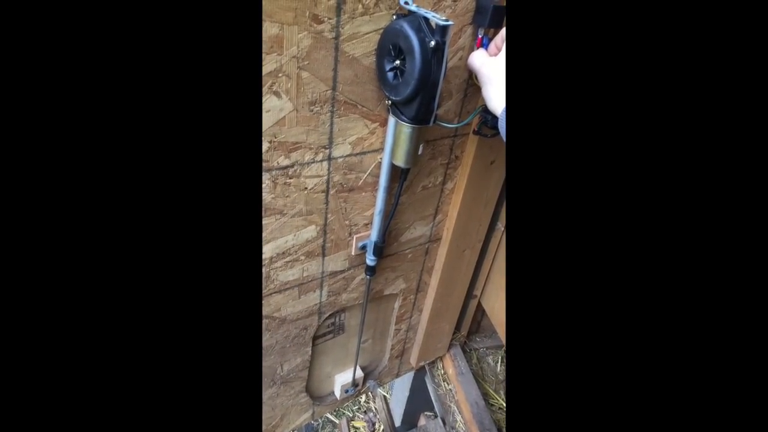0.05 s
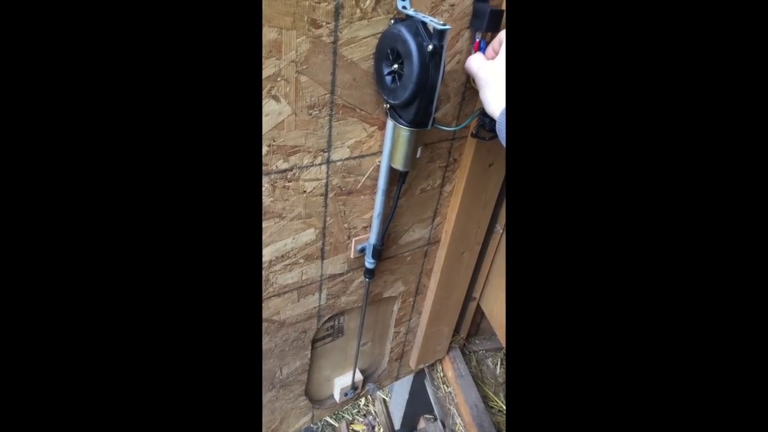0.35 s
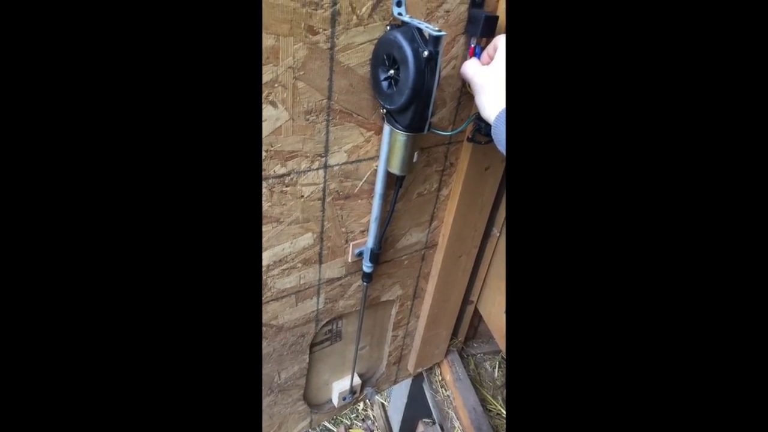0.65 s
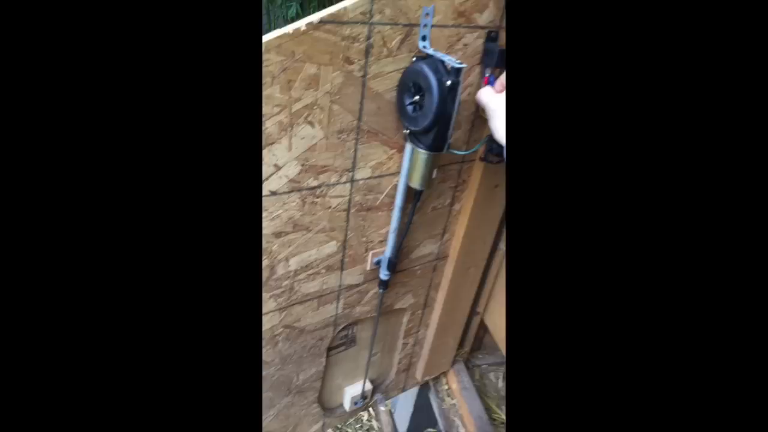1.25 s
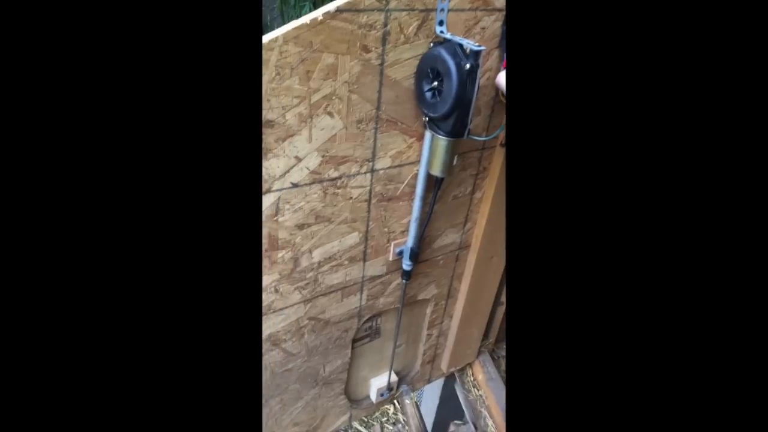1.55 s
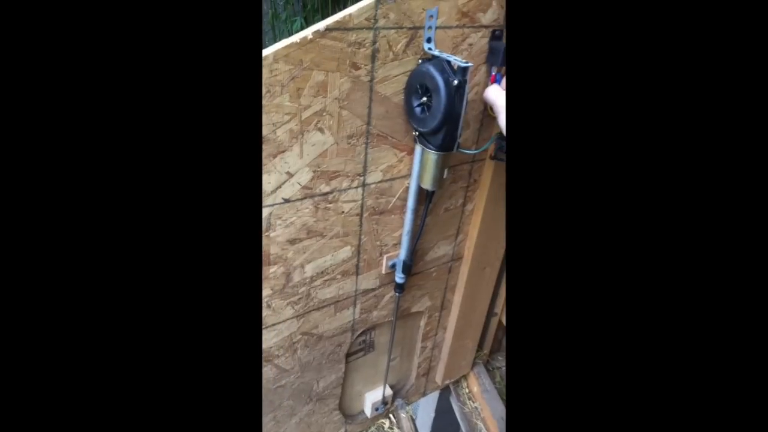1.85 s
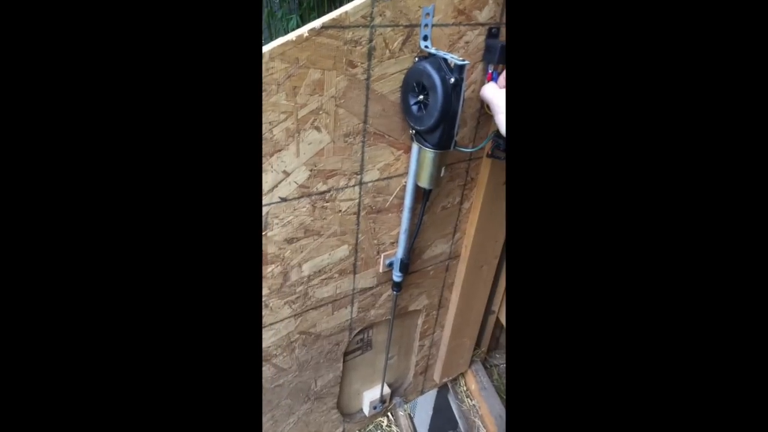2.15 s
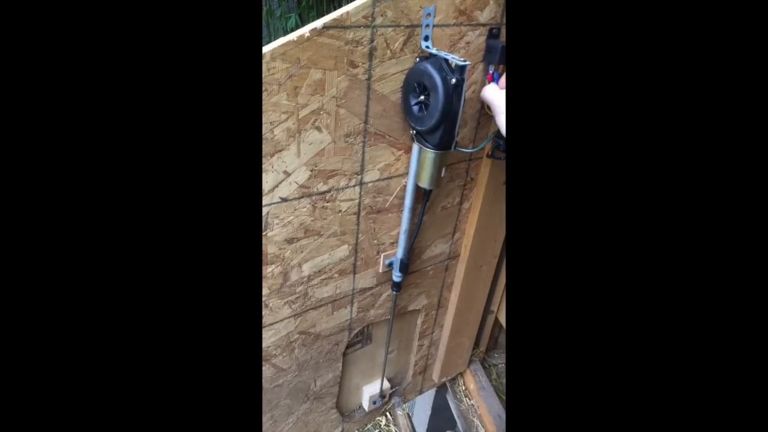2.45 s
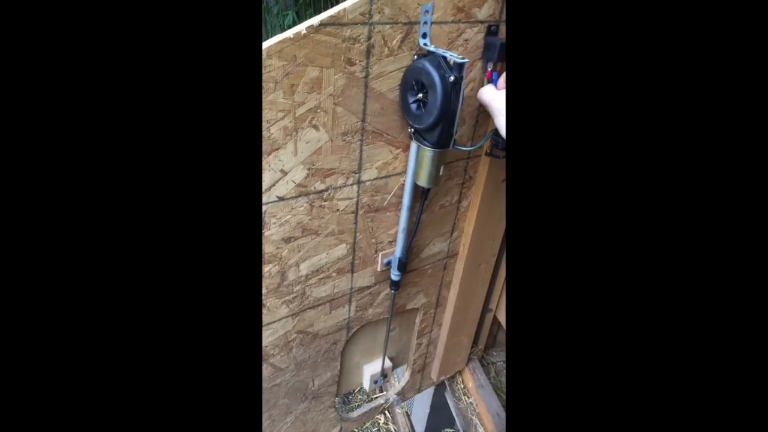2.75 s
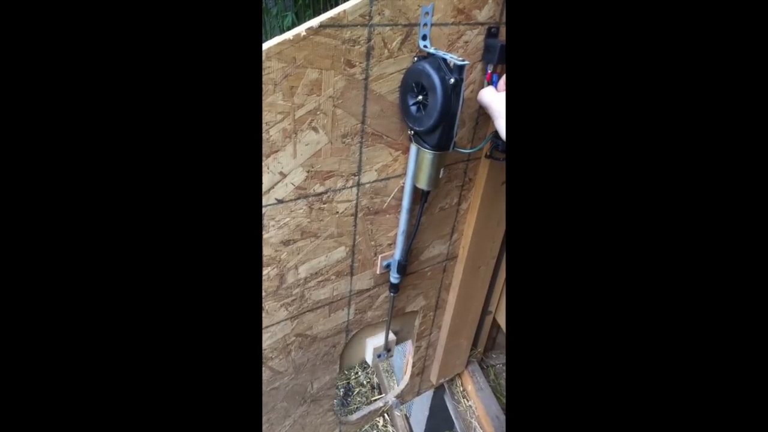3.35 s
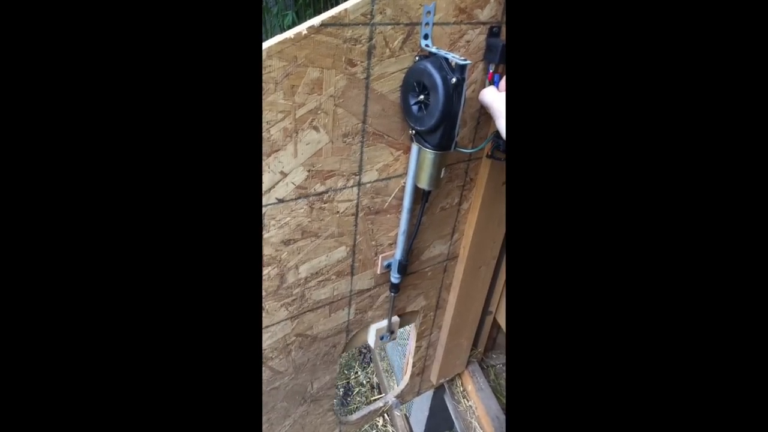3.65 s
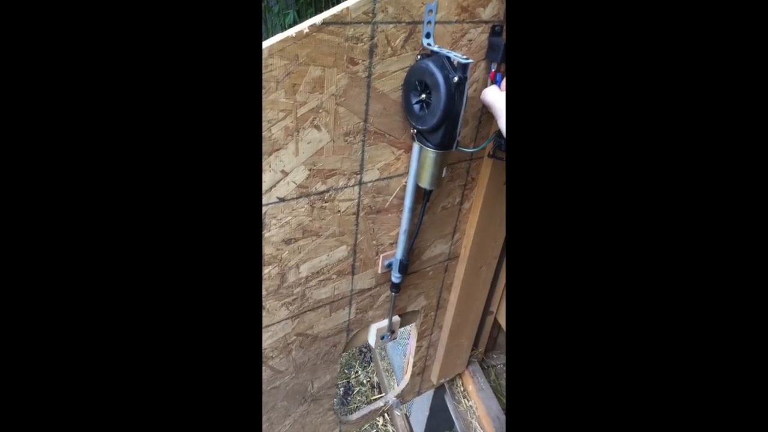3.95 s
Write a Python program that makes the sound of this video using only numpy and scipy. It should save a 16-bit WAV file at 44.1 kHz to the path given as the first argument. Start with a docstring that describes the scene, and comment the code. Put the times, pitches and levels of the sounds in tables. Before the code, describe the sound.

A small geared motor whirs close by outdoors. First there is only low wind, then a plastic switch clicks and the motor runs, hissing under load as a wooden hatch scrapes upward and knocks against a plywood wall.

```python
"""Outdoors by a plywood wall, a rocker switch clicks and a small geared motor winches up a wooden hatch.
The motor's brushes scratch the same pattern on every turn and its gears whine; it slows and hisses
under load. The hatch sticks and slips in its guides, so it judders and scrapes, and it bumps the wall
as the drive starts and twice more on the way up. Behind it are a low wind rumble and faint birds."""
import sys
import numpy as np
from scipy import signal
from scipy.fft import rfft, irfft
from scipy.io import wavfile
from scipy.ndimage import uniform_filter1d, map_coordinates

SR = 44100
rng = np.random.default_rng(int(sys.argv[2]) if len(sys.argv) > 2 else 0)


def put_to_file(sound):
    """Save the sound as 16-bit audio at rate SR, in the file named by the first command-line argument."""
    columns = np.atleast_2d(sound).T  # one column per channel
    safe = np.clip(columns, -1, 1)
    whole_steps = np.round(safe * 32767)
    wavfile.write(sys.argv[1], SR, whole_steps.astype(np.int16))


N = 176400  # 4 seconds


def undb(db):
    """Turn decibels into a number to multiply by."""
    return 10 ** (np.asarray(db) / 20)


def unit(x):
    """Scale a signal to an average (rms) strength of 1."""
    return x / np.sqrt(np.mean(x ** 2))


def curve(rows):
    """Join (time [s], value) rows with straight lines."""
    return np.interp(np.arange(N) / SR, *np.array(rows, float).T)


def fade(t, t60):
    """Die away by 60 dB every t60 seconds."""
    return np.exp(-np.log(1000) * np.maximum(t, 0) / t60)


def wander(rate_hz):
    """A smooth random wobble, about 1 in size."""
    hold = int(SR / rate_hz)
    steps = np.repeat(rng.standard_normal(N // hold + 1), hold)
    return unit(uniform_filter1d(uniform_filter1d(steps, hold), hold)[:N])


def colour(x, points):
    """Make some pitches louder and others softer, following (frequency [Hz], gain [dB]) rows."""
    hz, db = np.array(points, float).T
    size = 2 * N
    freqs = np.maximum(np.arange(N + 1) * SR / size, 1)
    gain = undb(np.interp(np.log(freqs), np.log(hz), db))
    cepstrum = irfft(np.log(gain))
    cepstrum[1:N] *= 2  # folded so the filter rings only after a sound, never before
    cepstrum[N + 1:] = 0
    return irfft(rfft(x, size) * np.exp(rfft(cepstrum)))[:N]


def keep_side(x, hz, side):
    """Keep the "low" or "high" side of a frequency, with a gentle slope."""
    return signal.sosfilt(signal.butter(2, hz, side, fs=SR, output="sos"), x)


def grains(spread_db):
    """Gritty noise: a crowd of tiny clicks of uneven size."""
    return unit(rng.standard_normal(N) * undb(spread_db * np.minimum(rng.exponential(size=N), 4)))


def wind():
    """Steady distant air whose low rumble swells and flutters, plus a soft rustle."""
    # tone of the outdoor air (frequency [Hz], gain [dB])
    air_tone = [(12, -57.5), (20, -37), (41, -7.5), (68, 0.5), (101, -6.5), (130, -4), (204, -13),
                (399, -18), (499, -21), (542, -20), (759, -21.5), (976, -20.5), (1480, -28), (1910, -36),
                (2080, -36), (2320, -46), (4810, -55), (14700, -63), (16000, -72)]
    # swell of the rumble against the steady air (time [s], gain [dB])
    swell = [(0, 1.5), (.38, -0.5), (.44, 5.5), (.5, -3.5), (.8, 0), (1.35, -0.5), (1.7, -2), (2.15, 3),
             (2.6, -3), (3.3, 1), (3.55, 0.5), (3.85, -1), (4, -0.5)]
    # tone of the rustle (frequency [Hz], gain [dB])
    rustle_tone = [(60, -30), (170, 2), (330, -2.5), (500, -7.5), (1000, -26), (3000, -51.5)]
    # loudness of the rustle (time [s], level [dB])
    rustle_level = [(0, -85.5), (1.4, -63), (1.65, -58), (1.9, -54), (2.2, -54), (2.35, -49), (2.5, -47.5),
                    (3.6, -55.5), (4, -62)]
    air_db, rumble_hz, flutter_db = -46.5, 140, 2
    air = unit(colour(rng.standard_normal(N), air_tone))
    # filtering forwards, then backwards, keeps the rumble in step with the air
    rumble = keep_side(keep_side(air, rumble_hz, "low")[::-1], rumble_hz, "low")[::-1]
    gust = undb(curve(swell) + flutter_db * wander(7.4))
    rustle = unit(colour(rng.standard_normal(N), rustle_tone)) * undb(curve(rustle_level))
    return (air + rumble * (gust - 1)) * undb(air_db) + rustle


def birds(t):
    """Far birds give thin peeps with a wavering pitch."""
    # peeps (start [s], length [s], pitch [Hz], level [dB])
    peeps = [(1.5, .04, 6100, -88), (1.687, 0.063, 6080, -81), (1.76, .05, 9450, -90),
             (1.84, .06, 9550, -89)]
    wavering_time = np.cumsum(1 + .015 * wander(150)) / SR
    out = np.zeros(N)
    for start, length, hz, db in peeps:
        arch = np.sin(np.pi * np.clip((t - start) / length, 0, 1))
        out += undb(db) * arch * np.sin(2 * np.pi * hz * wavering_time)
    return out


def switch(t):
    """The plastic rocker snaps sharply; each snap leaves a short, duller ring."""
    # tone of the plastic (frequency [Hz], gain [dB])
    plastic_tone = [(250, -10), (800, -5), (1650, 7), (2000, 3.5), (2330, -1), (2800, -2.5), (3300, -1),
                    (4500, -0.5), (5500, 3.5), (6000, -2.5), (6500, 9), (7400, -6), (9800, -4.5),
                    (11600, -6.5), (15500, -8)]
    # clicks (time [s], level [dB], low edge [Hz], high edge [Hz])
    clicks = [(2.158, -58, 9800, 16000), (2.2885, -39.5, 1500, 16000), (2.293, -30.5, 2460, 16000),
              (2.301, -30, 1000, 13900), (2.335, -47, 1510, 4440), (2.4612, -32, 2430, 16000),
              (2.4778, -30, 800, 14000), (2.4861, -29.5, 2230, 16000)]
    rise_s, ring_db, ring_top_hz = .0006, -10, 7000
    plastic = colour(rng.standard_normal(N), plastic_tone)
    out = np.zeros(N)
    for start, db, low_hz, high_hz in clicks:
        age = t - start
        snap = unit(keep_side(keep_side(plastic, low_hz, "high"), high_hz, "low"))
        ring = undb(ring_db) * keep_side(np.roll(snap, int(start * SR)), ring_top_hz, "low")
        rise = np.clip(age / rise_s, 0, 1)
        out += undb(db) * rise * (snap * fade(age - rise_s, t60=.014) + ring * fade(age, t60=.071))
    return out


def plywood(push, struck):
    """The wall and hatch ring at their own pitches when rubbed or struck."""
    # the wood's notes (pitch [Hz], gain when rubbed [dB], gain when struck [dB], time to fade 60 dB [s])
    notes = [(135.3, -1.5, -25, 0.42), (187, -4.5, -4.5, 0.27), (254.4, 1, -4, 0.15), (286.9, -10, 3, 0.14),
             (364, -2.5, 4.5, 0.07), (463, -22, -6.5, 0.1), (604, -11, -14, 0.2), (765.4, -11, -9.5, 0.076),
             (1014, -21, -8, 0.091), (1200, -37, -31, .08), (1816, -15, -10, 0.084), (2020, -24, -11, 0.1),
             (2630, -42, -21, 0.15), (3200, -24, -17, 0.13)]
    t = np.arange(SR // 2) / SR
    ring = sum(undb(hit_db if struck else rub_db) * np.sin(2 * np.pi * hz * t) * fade(t, t60)
               for hz, rub_db, hit_db, t60 in notes)
    return signal.fftconvolve(push, ring)[:N]


def knocks(t):
    """A thump as the switch is pressed, then bumps as the drive starts and the hatch catches: the wall rings,
    thuds and crunches."""
    # bumps (time [s], strength [dB], centre of the blow [Hz], width of the blow [Hz], crunch level [dB])
    bumps = [(2.31, -42.5, 302, 198, -48), (2.492, -37, 980, 406, -46), (3.1676, -34, 570, 213, -36.5),
             (3.181, -39, 626, 295, -44), (3.738, -41.5, 1470, 2900, -34.5), (3.7411, -24.5, 330, 404, -30),
             (3.7745, -32.5, 227, 198, -44)]
    # tone of crunching wood (frequency [Hz], gain [dB])
    crunch_tone = [(150, -23), (400, 20), (1000, 1.5), (3000, -10), (6000, -15.5), (15000, -26)]
    thud_gain_db, thud_top_hz = 25.5, 4500
    push, crunch = np.zeros(N), np.zeros(N)
    wood_noise = colour(rng.standard_normal(N), crunch_tone)
    for start, db, hz, width, crunch_db in bumps:
        contact = signal.iirpeak(hz, hz / width, fs=SR)
        blow = np.zeros(N)
        blow[int(start * SR)] = undb(db)
        push += signal.lfilter(*contact, blow + 1e-18)  # the tiny offset keeps the filter fast
        burst = undb(crunch_db) * (t >= start) * fade(t - start, t60=.081)
        crunch += unit(signal.lfilter(*contact, wood_noise)) * burst
    thud = undb(thud_gain_db) * keep_side(push, thud_top_hz, "low")
    return plywood(push, struck=True) + thud + crunch


def hatch_judder():
    """The hatch sticks and slips many times a second, which makes the wall hum."""
    # loudness of the low hum (time [s], level [dB])
    hum_level = [(2.48, -55), (2.52, -41.5), (2.56, -38), (2.6, -41), (2.64, -43), (2.68, -53),
                 (2.72, -40.5), (2.76, -37), (2.785, -54), (2.89, -46), (2.94, -49.5), (3.0, -47.5),
                 (3.14, -55), (3.3, -56), (3.5, -55.5), (3.65, -51), (3.73, -53), (3.85, -64), (4, -75)]
    # loudness of the buzz above the hum (time [s], level [dB])
    buzz_level = [(2.48, -54), (2.54, -49), (2.65, -53.5), (2.75, -47.5), (2.88, -48.5), (3.02, -51.5),
                  (3.14, -57.5), (3.4, -63.5), (3.65, -54), (3.75, -56), (4, -71)]
    slip_hz, gap_spread, size_spread_db, hum_top_hz = 188.3, .025, 2.5, 210
    gap_chance, size_chance = rng.standard_normal((1000, 2)).T
    slip_times = np.cumsum(np.exp(gap_spread * gap_chance)) / slip_hz
    slips = np.bincount((slip_times * SR).astype(int), undb(size_spread_db * size_chance), N)[:N]
    judder = plywood(slips - slips.mean(), struck=False)
    hum = signal.sosfiltfilt(signal.butter(6, hum_top_hz, fs=SR, output="sos"), judder)
    even_hum = hum / np.sqrt(uniform_filter1d(hum ** 2, size=2000) + 1e-12)
    buzz = unit(judder - hum)
    return even_hum * undb(curve(hum_level)) + buzz * undb(curve(buzz_level))


def hatch_scrape():
    """The hatch's wooden edges rub along the guides."""
    # tone of the scrape (frequency [Hz], gain [dB])
    tone = [(60, -25.5), (115, 5), (200, 9), (350, -4.5), (600, 2), (900, -6), (1200, -12.5), (1600, -13),
            (3000, -25.5)]
    # loudness of the scrape (time [s], level [dB])
    level = [(2.48, -42.5), (2.54, -43.5), (2.65, -53), (2.76, -50.5), (3.1, -53), (3.2, -50.5),
             (3.32, -53.5), (3.65, -45.5), (3.73, -58), (3.85, -65), (4, -57)]
    return unit(colour(grains(spread_db=4), tone)) * undb(curve(level))


def wall_echo(x):
    """Add the sound that bounces off the plywood close behind the motor."""
    delay_s, echo_db = .003, -9
    return x + undb(echo_db) * np.pad(x, (int(delay_s * SR), 0))[:N]


def gear_whine(turns):
    """Gear teeth meet 32 times a turn: a wavering whine, with a softer tone an octave below."""
    whine_db, lower_db, waver_db = -72, -75, 1.5
    phase = 2 * np.pi * 32 * turns
    whine = undb(whine_db + waver_db * wander(9)) * np.sin(phase)
    lower = undb(lower_db + waver_db * wander(5)) * np.sin(phase / 2)
    return whine + lower


def load_hiss(throb):
    """The motor hisses under load, pulsing with each turn."""
    # tone of the hiss (frequency [Hz], gain [dB])
    tone = [(900, -13), (1700, 5), (2200, 11), (2800, -2), (3800, 7), (4900, -4), (6100, 3), (7200, -0.5),
            (9000, 2), (10400, -4.5), (12600, -6), (13500, -17), (15500, -23)]
    # loudness of the hiss (time [s], level [dB])
    level = [(2.5, -61), (2.65, -58.5), (2.95, -60.5), (3.24, -60.5), (3.28, -66), (3.41, -73),
             (3.45, -61.5), (3.73, -56.5), (3.755, -67), (4, -67)]
    return unit(colour(throb * grains(spread_db=2.5), tone)) * undb(curve(level))


def brush_whirr(turns, throb):
    """The brushes (sliding contacts) scratch the same pattern each turn and make the case ring."""
    # notes of the motor case (pitch [Hz], width [Hz], gain [dB])
    case_notes = [(2050, 170, 9.5), (2300, 43, 12), (3130, 240, 1), (4030, 370, 4.5), (4670, 110, 2.5),
                  (5380, 270, 1), (5900, 250, 8), (6240, 130, 1), (6450, 140, 1), (7360, 110, 4),
                  (8300, 350, 1), (8800, 180, -1), (10740, 440, -5), (12400, 260, -20)]
    # broad tone of the case between its notes (frequency [Hz], gain [dB])
    case_tone = [(700, -3.5), (1400, -10.5), (2350, 9), (2600, -28), (3800, -18), (5050, -9), (7000, -12),
                 (9300, -11), (10000, -22), (12800, -17), (13500, -37), (15500, -12)]
    # loudness of the whirr (time [s], level [dB])
    level = [(2.5, -64), (2.65, -58.5), (2.95, -59), (3.22, -58.5), (3.3, -60), (3.4, -59.5), (3.5, -60),
             (3.72, -65.5), (3.78, -62.5), (3.86, -61), (4, -60)]
    grit_share = .05  # the part of the power that does not repeat
    overtones = undb(rng.uniform(-8, 4, size=301))
    one_turn = irfft(overtones * np.exp(2j * np.pi * rng.random(size=301)))
    scratch = unit(map_coordinates(one_turn, [turns % 1 * len(one_turn)], mode="grid-wrap"))
    brushes = throb * (np.sqrt(1 - grit_share) * scratch + np.sqrt(grit_share) * grains(spread_db=2.5))
    ring = sum(undb(db) * signal.lfilter(*signal.iirpeak(hz, hz / width, fs=SR), brushes)
               for hz, width, db in case_notes)
    return unit(wall_echo(ring + colour(brushes, case_tone))) * undb(curve(level))


def motor():
    """One spinning shaft sets the pace of the whirr, the pulsing hiss and the whine."""
    # shaft speed, sagging under load (time [s], turns per second [Hz])
    speed = [(2.48, 68), (2.53, 73), (2.79, 73.9), (2.92, 73.6), (3.05, 72.8), (3.14, 72.8), (3.18, 69.8),
             (3.23, 69.6), (3.28, 72), (3.33, 72), (3.38, 72.6), (3.45, 67.6), (3.6, 66.7), (3.76, 66.5),
             (3.83, 72.3), (3.88, 71.8), (4, 72.1)]
    turn_hz = curve(speed) * (1 + .0003 * wander(20))  # never quite steady
    turns = np.cumsum(turn_hz) / SR
    throb = 1 + .2 * np.sin(2 * np.pi * turns)
    return brush_whirr(turns, throb) + load_hiss(throb) + gear_whine(turns)


def scene():
    """Over wind and birds, the switch clicks and the motor and hatch start together."""
    start_s, fade_in_s = 2.478, .018
    t = np.arange(N) / SR
    running = np.clip((t - start_s) / fade_in_s, 0, 1)
    mix = wind() + birds(t) + switch(t)
    mix += running * (motor() + hatch_judder() + hatch_scrape())
    mix += knocks(t)
    return mix[None]  # one channel


def record(dry):
    """Cut the deepest rumble and the very highest treble."""
    low_cut_hz, top_hz = 33, 15800
    steep_cut = signal.ellip(10, .2, 70, top_hz, fs=SR, output="sos")
    return signal.sosfilt(steep_cut, keep_side(dry, low_cut_hz, "high"))


dry = scene()
out = record(dry)
put_to_file(out)
```